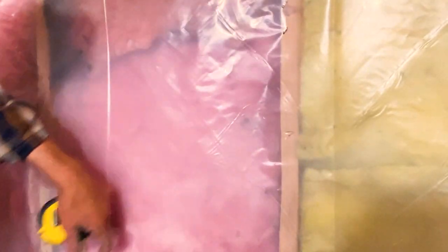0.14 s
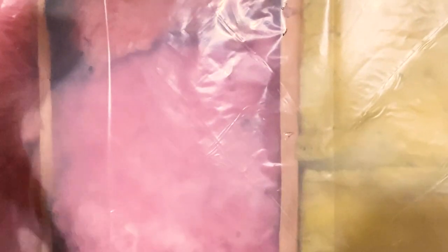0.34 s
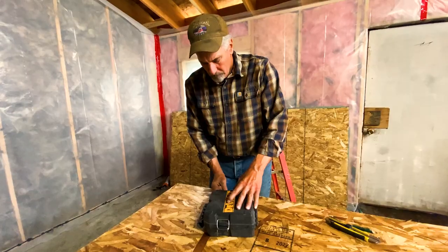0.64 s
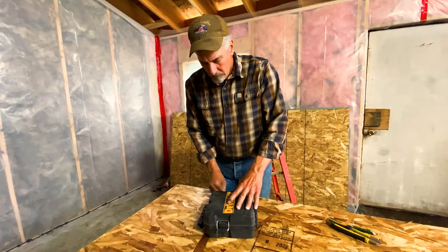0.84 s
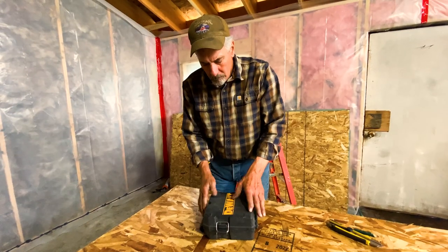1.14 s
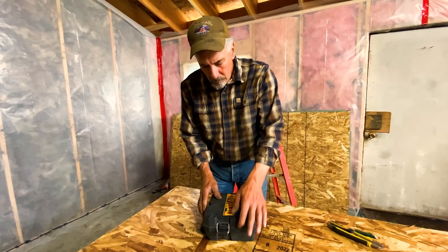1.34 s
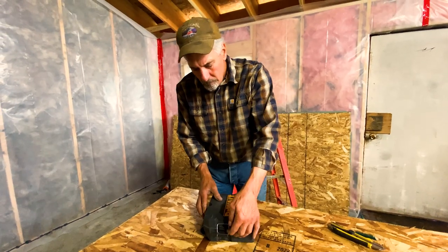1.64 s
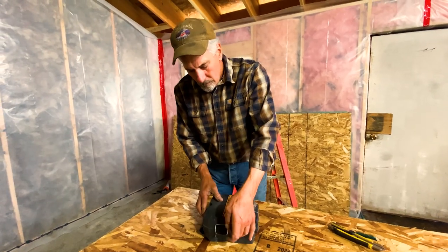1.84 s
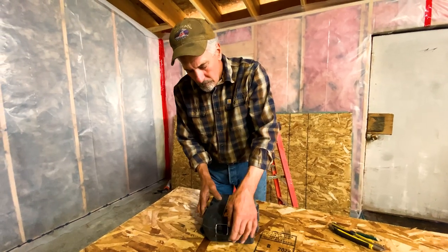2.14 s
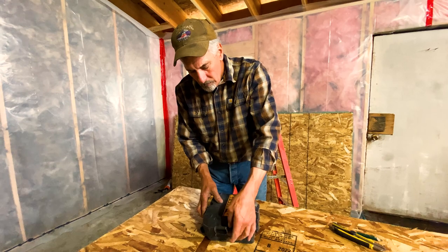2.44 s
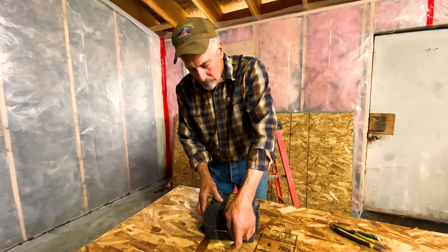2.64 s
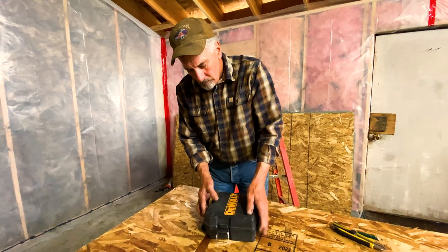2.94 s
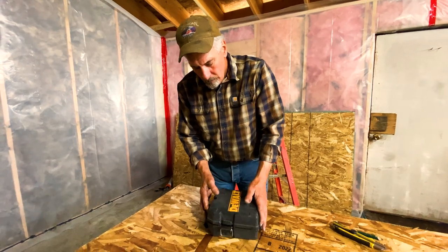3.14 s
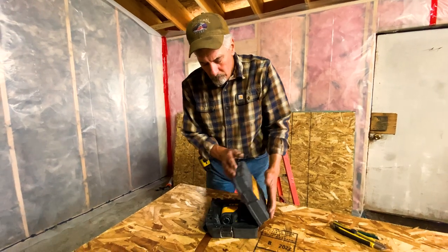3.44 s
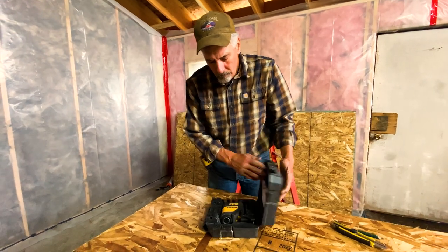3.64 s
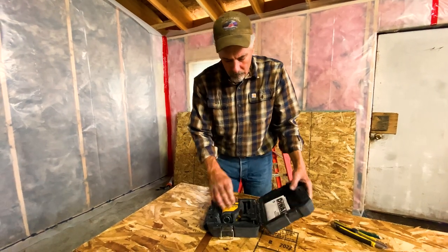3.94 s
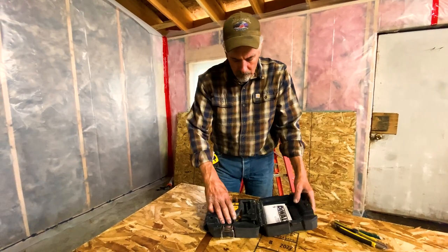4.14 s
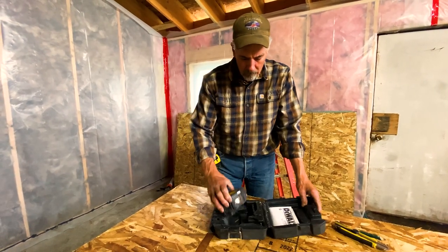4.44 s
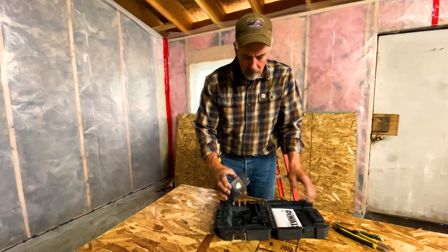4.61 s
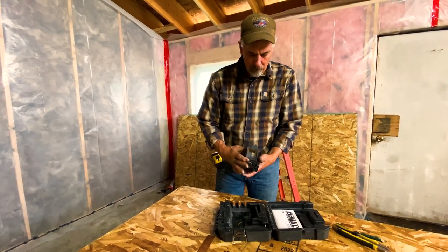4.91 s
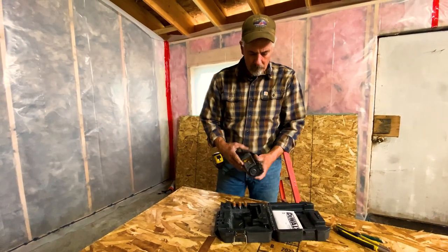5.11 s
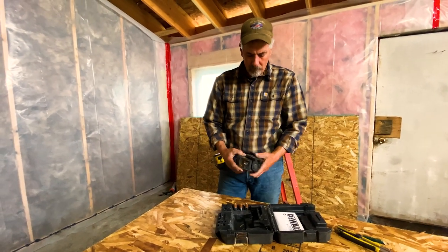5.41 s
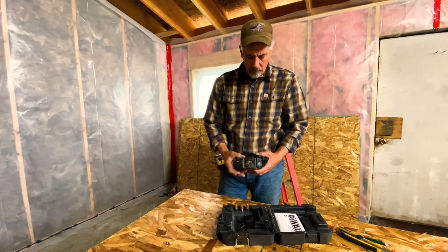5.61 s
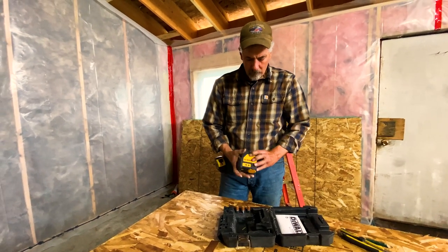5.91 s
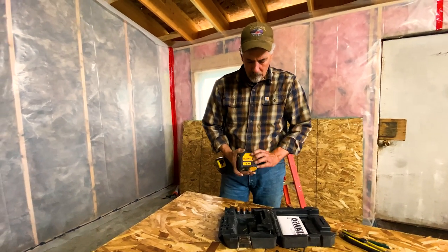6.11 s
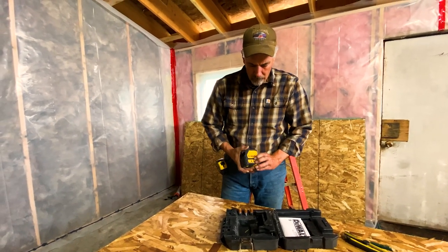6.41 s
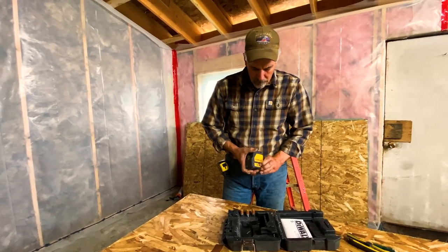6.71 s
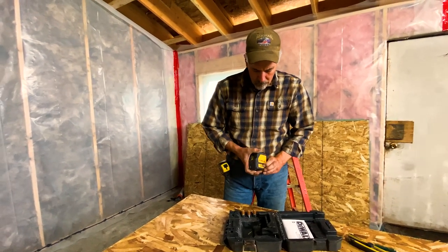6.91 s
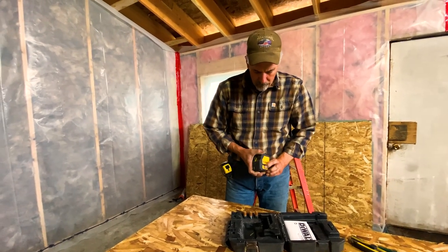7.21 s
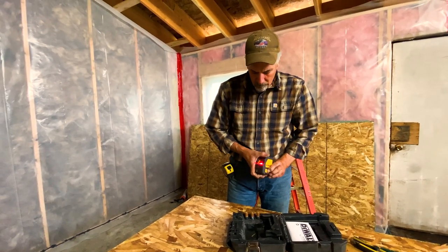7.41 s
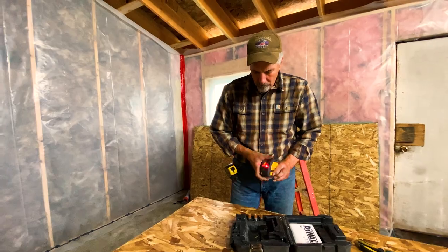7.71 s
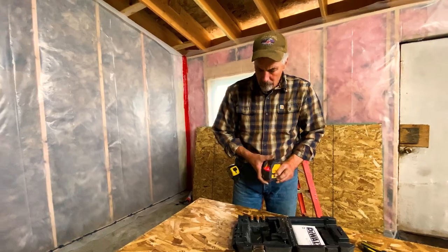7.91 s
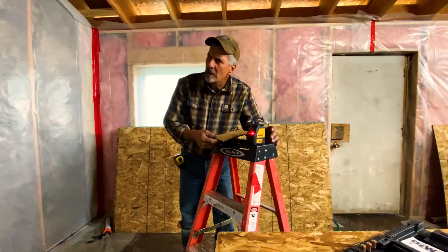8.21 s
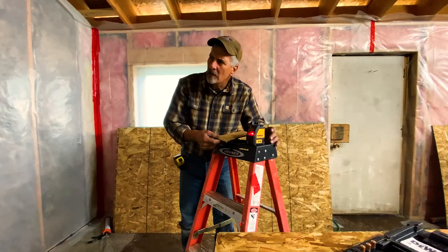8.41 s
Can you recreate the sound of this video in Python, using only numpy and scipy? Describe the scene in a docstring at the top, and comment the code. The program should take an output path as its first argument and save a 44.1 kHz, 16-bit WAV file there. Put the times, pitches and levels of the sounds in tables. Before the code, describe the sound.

From 0 to 0.3 seconds a steel tape rasps brightly into its housing, ending at 0.32 in a hard double snap with a soft noisy tail. At 0.65 to 0.9 a plastic case clatters onto a wooden bench, loudest near 0.86, with jingling latches. From 1.1 to 2.7 come small hollow knocks, dull board thumps and hand rustle, with a sharp latch crack at 1.9. The loudest, a bright latch snap, comes at 2.81. The case shifts and opens with knocks at 3.1 to 3.5, lighter bumps to 4.3, then a heavy clattering cluster at 4.45 to 4.7. Then it is nearly silent: clear small-tool clicks at 5.28 and 5.95, a fainter one at 7.34, barely audible handling. Faint low generator chugging runs outside throughout, fading, then swelling after 8.27 until the end at about 8.6. Short shed reverberation, close stereo microphone.

```python
"""In a bare timber shed a tape measure reels in and snaps home; then hands unlatch a plastic tool case on a board bench,
open it and lift out a small tool, whose switches click. A generator chugs outside, over still air.
Knocks, thumps, latches and switches are bodies struck by short noisy forces; tape, soft swells and air are shaped
noise; the generator is a train of filtered pulses. A stereo microphone with two ports listens."""
import sys
import numpy as np
from scipy import signal
from scipy.fft import rfft, irfft, next_fast_len
from scipy.io import wavfile
from scipy.ndimage import uniform_filter1d

SR = 44100
rng = np.random.default_rng(int(sys.argv[2]) if len(sys.argv) > 2 else 0)


def unload_wav(signal):
    """Save mono or channel-first audio to the path in sys.argv[1] as 16-bit WAV at rate SR, clipped to [-1, 1]."""
    wavfile.write(
        sys.argv[1],
        SR,
        np.round(np.clip(np.atleast_2d(signal).T, -1, 1) * 32767).astype(np.int16),
    )


N = 377055  # length in samples

# Still air in the shed. Each row: frequency in Hz, density in dB per Hz, relative.
AIR_COLOUR = [(40, -4), (130, -3), (250, -11), (330, -14), (500, -19), (1380, -21.5), (1660, -34),
              (6400, -30), (7200, -40), (10600, -42.5), (12000, -61), (15500, -68.5)]
AIR_DB = -65.5
# Exhaust through the walls at the first listening place. Each row: frequency in Hz, relative level in dB.
EXHAUST_FIRST = [(23, -31.5), (47, -2), (70, 0), (93, 0), (117, -1), (140, 4), (163, -1.5), (187, -13.5),
                 (210, 1.5), (233, 2.5), (257, -14.5), (300, -29), (450, -24), (900, -46.5), (3000, -94.5)]
# The same exhaust at the second place. Each row: frequency in Hz, relative level in dB.
EXHAUST_SECOND = [(23, -25.5), (47, -21), (70, -17), (93, 6), (117, -8.5), (140, -13), (163, 13),
                  (187, -7.5), (210, 4.5), (233, -14.5), (257, -4.5), (300, -36.5), (500, -28.5),
                  (900, -52), (3000, -95)]
# Course of the generator. Each row: time in seconds, level in dB, share of the second place (0 to 1),
# left over right in dB.
CHUG_COURSE = [(0, -56, 0.29, -2), (4.997, -59, 0.22, -7), (6.3, -63, 0.038, -7.5), (7.6, -64, 0, -8.5),
               (8.2, -65, 0.075, -10.5), (8.27, -62.5, 0.66, -3.5), (8.55, -50, 0.89, -2.5)]
FIRING_HZ = 23.35

# Dying of the reverberation. Each row: frequency in Hz, t60 in seconds.
SHED_T60 = [(100, 0.44), (400, 0.4), (1000, 0.38), (2800, 0.54), (7000, 0.56), (14000, 0.29)]
# Balance of the reverberation. Each row: frequency in Hz, relative level in dB.
SHED_BALANCE = [(60, -4.5), (250, -16), (1000, -8.5), (4000, -6.5), (14000, -12)]
# Likeness of left and right in diffuse sound. Each row: frequency in Hz, likeness (0 to 1).
LIKENESS = [(60, 0.7), (180, 0.18), (550, 0.53), (1650, 0.079), (4970, 0.051), (15000, 0.32)]
# Phase gap between the microphone ports. Each row: frequency in Hz, lead of the left in radians.
PORT_PHASE = [(0, -0.5), (2410, 0.5), (3360, 1.5), (4480, 1.5), (6120, 8.5), (6550, -3), (9220, 15),
              (9910, 11), (11800, 30), (12700, 7), (13500, 5.5), (14500, 4.5), (15200, 3.5), (15700, 0)]
EDGE_HZ = 16100  # upper band limit

# Swells of soft noise: hands and cloth moving, and noisy tails after the loud knocks.
# Each row: peak in seconds, level in dB, brightness in dB, rise in seconds, fall in seconds.
SWELLS = [(.38, -48.5, 5.5, 0.24, 0.69), (.74, -44, -9, 0.13, 0.092), (0.872, -25, 1.5, 0.029, .08),
          (.95, -37, 2.5, 0.098, 0.2), (1.231, -63, -8.5, 0.22, 0.55), (1.5, -47, -1.5, 0.12, 0.12),
          (1.68, -55.5, -2, 0.15, 0.52), (1.9, -43, -4, 0.18, 0.22), (2.36, -61, -6, 0.78, 1),
          (2.74, -52.5, -10.5, 0.052, .1), (2.92, -44.5, -1.5, 0.24, 1), (3.18, -40.5, -3.5, 0.072, 0.43),
          (3.38, -39, -2.5, 0.07, 0.15), (3.5, -47.5, 3.5, 0.32, .2), (3.69, -54, 2, 0.19, 0.99),
          (4.08, -57, 4, 0.35, 0.44), (4.35, -46.5, -3.5, 0.36, 0.8), (4.6, -64.5, 7, 0.38, 0.9),
          (4.99, -71.5, 10.5, 0.11, 0.13), (5.12, -69.5, 0.5, 0.11, 0.25), (5.42, -69, 2.5, 0.54, .2),
          (5.632, -67, 8, 0.083, 0.14), (5.764, -66, 6, 0.076, 0.32), (6.24, -65, -1, 0.44, 0.36),
          (6.52, -73.5, -3, .15, 0.31), (6.75, -69, -5, 0.67, 0.27), (7.18, -73.5, 0, 0.059, .15),
          (7.3, -74, -6, .1, 0.21), (7.6, -75.5, -0.5, .12, 0.12), (7.71, -76, 6, .06, 0.11),
          (7.84, -72, 2, 0.24, 0.16), (8.04, -72.5, 6.5, 0.11, 0.26), (8.22, -73.5, 0, 0.22, 0.066)]
# High range of the swells. Each row: frequency in Hz, density in dB per Hz, relative.
HISS_COLOUR = [(1760, -37.5), (3000, -8.5), (4300, -3.5), (5590, -3), (6940, -9), (10300, -10),
               (12100, -13), (12900, -12), (14300, -19.5), (15600, -33.5), (16000, -73.5)]
# Middle range of the swells. Each row: frequency in Hz, density in dB per Hz, relative.
SCRAPE_COLOUR = [(600, -27), (900, -3.5), (1500, 1), (2500, -2), (3800, -11.5), (5000, -34)]
# Low range of the swells. Each row: frequency in Hz, density in dB per Hz, relative.
RUMBLE_COLOUR = [(120, -29), (260, -4), (400, -9.5), (700, -3.5), (1000, -5.5), (1400, -40.5)]
HISS_DB, RUMBLE_DB = -2.5, -3  # relative to the scrape, before brightness
FADE_DB = 23  # drop over one rise or fall time
RESTING_DB = -92  # the soft noise never quite stops

# Switches of the small tool. Each row: start in seconds, click in dB, note in Hz, note over click in dB,
# contact in ms.
SWITCHES = [(5.281, -30, 2160, 6, 3.06), (5.949, -27.5, 1300, -2.5, 2.6), (7.339, -45, 1600, -11, 2)]
# Colour of a click in the tool's housing. Each row: frequency in Hz, density in dB per Hz, relative.
HOUSING_COLOUR = [(180, -47), (300, -4.5), (559, -10.5), (814, -6), (959, -21), (1210, 0), (2140, -6.5),
                  (3330, -15), (6840, -19.5), (15000, -53)]
TOOL_NOTE_S = .013  # t60

# Steel tape running in. Each row: time in seconds, level in dB.
TAPE_COURSE = [(0.0, -42.5), (0.036, -38.5), (0.19, -32), (0.21, -36.5), (0.312, -40), (0.315, -36)]
# Colour of the tape's rasp. Each row: frequency in Hz, density in dB per Hz, relative.
TAPE_RASP = [(240, -54), (400, -23), (1110, -15.5), (1310, -18.5), (2150, -7.5), (5590, -4), (10400, -7.5),
             (12100, -18.5), (13500, -14), (15200, -25), (16000, -53)]

# Dull thumps through the bench. Each row: start in seconds, peak level in dB, pitch in Hz, deep board over pitch in dB.
THUMPS = [(0.318, -32, 253, -31), (0.415, -53, 175, 10), (0.721, -35.5, 267, -19), (.789, -35, 210, -11),
          (0.867, -38, 272, -11), (1.112, -29, 249, -8), (1.183, -27, 261, -15.5), (1.24, -39.5, 302, -2),
          (1.271, -37, 227, -21), (1.509, -35, 228, -24), (1.678, -40.5, 226, -6), (1.859, -34.5, 185, -12),
          (1.949, -37, 237, -6), (2.209, -40, 227, -6.5), (2.253, -36.5, 281, -15),
          (2.555, -40.5, 270, -17), (2.806, -44, 238, -20), (3.197, -33.5, 182, -2),
          (3.228, -25, 240, -2.5), (3.361, -25, 237, -3.5), (3.407, -39, 124, 7), (3.69, -33, 337, -4.5),
          (4.067, -40.5, 208, -0.5), (4.188, -44.5, 249, -0.5), (4.259, -40, 224, -5),
          (4.321, -36, 217, -9), (4.464, -29.5, 195, -4.5), (4.536, -11.5, 340, -18.5),
          (4.579, -19.5, 218, -5.5), (4.658, -40, 310, 4)]
# Deep modes of the board. Each row: frequency in Hz, relative level in dB, t60 in seconds.
BOARD_MODES = [(70, -6, 0.17), (91.7, 1, 0.2)]
PUSH_MS = 9

# Loose steel latches set ringing. Each row: start in seconds, level in dB, tilt toward the highs in dB per octave.
RATTLES = [(0.684, -50, -2), (0.706, -42.5, -3), (.851, -24.5, -4), (1.462, -59, -3.5), (1.89, -45, -9),
           (2.296, -49.5, -1.5), (2.731, -49, -2), (2.809, -34, 3.5), (3.103, -43.5, -1), (3.2, -37.5, 2),
           (3.366, -34, -1), (3.468, -37, 0), (4.261, -59.5, 5.5), (4.332, -56, -6), (4.456, -46, -4),
           (4.538, -39, -9.5), (4.565, -37, 4.5), (4.67, -42.5, 2)]
# Thin tones of the latches. Each row: frequency in Hz, level in dB, t60 in seconds.
STEEL_MODES = [(4510, -1.5, 0.21), (5557, -1, 0.56), (7210, -0.5, 0.25), (6700, -6.5, .35),
               (8310, -5, 0.18), (8560, 2, .2), (9270, -2.5, .25), (9300, -4, 0.16), (11040, 6, .22),
               (11520, -8, 0.33), (12340, -8, .2), (13330, -0.5, 0.45), (13650, -3.5, .15),
               (14900, -9, .12)]
RATTLE_MS = 7.7

# Knocks and clicks on plastic and steel. Each row: start in seconds, snap in dB, note in Hz, shell in dB and tick in dB
# (both relative to the snap), contact in ms, left over right in dB.
KNOCKS = [(0.027, -35, 3670, -21, 5, 1.4, 9), (.051, -41, 2390, -21, 10, 1, 2),
          (.323, -11.5, 3880, -44, 4, 5.9, 1), (.328, -9, 2610, -27, -22, 3.2, 7),
          (.607, -41.5, 840, -1, -13.5, 2.2, 2), (0.637, -52, 654, 11, -52, 4.2, -2),
          (0.657, -29, 654, 4, -40, 0.7, 10.5), (0.682, -46, 2350, 0, -8, 3.1, -9),
          (0.71, -20.5, 1600, -18, -7.5, 7.6, 0), (.73, -31.5, 930, -1.5, -1, 3.6, 7),
          (.794, -35, 816, -10, -7, 3.4, .5), (0.816, -38.5, 837, -0.5, 3.5, 22, 1),
          (0.851, -12, 2800, -28, -35, 5.1, -5), (.869, -10.5, 774, -18, -17, 7.5, -1),
          (.883, -15, 915, -19, -9, 2.8, 3), (1.087, -34, 690, -18, -33, 5, 3),
          (1.108, -36, 1040, -2, -29, 5.7, 4.5), (1.161, -30, 594, 2.5, -13, 3.4, -.5),
          (1.187, -48, 643, 6, -22, 2.2, 9), (1.236, -52.5, 807, 15.5, -23, 3.3, .5),
          (1.269, -38.5, 586, 10, -15, 7.3, 0), (1.284, -36.5, 891, -6, -16, 2.4, 0),
          (1.333, -49.5, 611, 8.5, -26, 2.7, 4), (1.409, -37.5, 760, -2.5, -13.5, 5.1, -.5),
          (1.467, -26.5, 765, -17, -3, 4.1, 0), (1.5, -26, 860, -2.5, -34, 8.7, -1),
          (1.511, -28.5, 880, -1.5, -15, 6.3, 0), (1.606, -28, 805, -20, -13, 7.2, -1.5),
          (1.633, -44, 770, -12, 2.5, 4.8, 1.5), (1.684, -32, 800, -15, -5, 8.2, -1),
          (1.71, -26.5, 940, -5, -1, 7.6, -.5), (1.864, -33, 645, -22, -19, 5.8, -1),
          (1.894, -11, 727, -44, -11.5, 4.7, -1.5), (1.959, -21.5, 830, -15, -14, 6.9, -.5),
          (1.988, -33, 2640, -5, -3, 3.7, 0), (2.199, -39, 795, -4.5, -12.5, 10, -0.5),
          (2.256, -62, 694, 13, -2, 4.9, 2), (2.298, -22, 810, -6.5, -3.5, 4.8, 0),
          (2.395, -30.5, 634, -21.5, -36, 7, 0), (2.448, -48, 1495, -3.5, -11.5, 3, -1.5),
          (2.56, -58.5, 780, 17, -32.5, 4.3, 0), (2.716, -31, 804, -16, -28, 10, -1),
          (2.735, -25.5, 800, -16.5, -7, 7.5, -0.5), (2.746, -28.5, 807, -19, -11, 20, 0),
          (2.81, -2, 1302, -24, -9.5, 3.8, .5), (2.813, -10, 2550, -30, -20, 4, 0),
          (3.102, -16.5, 1400, -30, -16.5, 4.9, -.5), (3.175, -17, 666, -17, -21, 9.8, -1),
          (3.204, -16.5, 1950, -6.5, -0.5, 5.3, -.5), (3.227, -18, 1020, -25, -10, 4.9, 3),
          (3.365, -11, 684, -12, -29, 6.3, -1), (3.377, -24, 640, 1.5, -3.5, 6.9, 1.5),
          (3.467, -28, 2260, -27, -9, 13, -3), (3.493, -26.5, 1070, -27, -16, 6.7, 0),
          (3.606, -33, 1320, -33, -7, 14, 0), (3.697, -32.5, 750, -0.5, -10, 15, -2.5),
          (3.973, -59, 1890, -22, 9, 1.5, -3), (4.038, -33.5, 910, -16, -9.5, 10, -2),
          (4.062, -33.5, 1740, -4.5, -11, 7, 1.5), (4.184, -35, 1610, -6.5, -17, 3.5, -1),
          (4.249, -36, 1190, -15, -9, 9.8, 0), (4.258, -36, 660, -10, -9, 11, -2),
          (4.321, -36, 840, -10, -25, 5.7, -1), (4.327, -28.5, 696, -14, -11.5, 11.5, -2),
          (4.456, -23.5, 890, 1.5, -19, 4, -1), (4.468, -28, 990, -12, -12, 13, 1),
          (4.541, -12, 800, -9, -21.5, 3.9, -11), (4.553, -16, 745, 2.5, -14, 6.1, 4),
          (4.566, -14.5, 1820, 2, -12, 6, -4), (4.575, -20, 930, -20, -9, 11, 9),
          (4.585, -22, 724, -8, -5.5, 4.2, -10), (4.599, -28, 720, -10, -3, 3.6, -3.5),
          (4.661, -27, 1510, -21, -27, 3.1, 8), (4.67, -27, 1430, -20, -4.5, 11, 0),
          (4.684, -24.5, 820, -8, -11.5, 7.4, 0)]
# Shell of the case. Each row: frequency in Hz, relative level in dB, t60 in seconds.
SHELL_MODES = [(302.3, 0.5, 0.099), (378, -2, 0.068), (430, 0, 0.057), (595, -2.5, 0.011), (640, -2.5, .03),
               (757, -8.5, 0.051), (825, -3, 0.023), (1080, -0.5, 0.022)]
# Lid of the case. Each row: frequency in Hz, relative level in dB, t60 in seconds.
LID_MODES = [(1350, 0.5, 0.0099), (1806, 3, 0.014), (2104, 10, 0.0098), (2500, 9.5, 0.0085),
             (3080, 3, 0.0048), (3480, -15, 0.011)]
# Colour of the tick. Each row: frequency in Hz, density in dB per Hz, relative.
TICK_COLOUR = [(2060, -29), (3500, -4), (4100, -7), (5400, -1.5), (6400, 0.5), (8300, -11), (10700, -2.5),
               (12100, -19), (13700, -13.5), (15000, -19), (16000, -36.5)]
NOTE_DB, LID_DB = -7.5, -10.5  # relative to the snap
NOTE_CYCLES, NOTE_EXTRA_MS = 8, 3  # a note's t60: this many cycles plus a fixed time


def gain_of(db):
    """Decibels to amplitude."""
    return 10 ** (np.asarray(db) / 20)


def evened(x):
    """Scales to rms 1."""
    return x / np.sqrt(np.mean(x ** 2) + 1e-20)


def unit(taps):
    """Scales a response to energy 1."""
    return taps / np.linalg.norm(taps, axis=-1, keepdims=True)


def read(points, hz):
    """Reads a table on a log-frequency axis."""
    f, value = np.transpose(points)
    return np.interp(np.log(hz + 1), np.log(f + 1), value)


def add(mix, s, sound):
    """Mixes a sound in at a time, cutting what runs past the end."""
    part = mix[..., round(s * SR):][..., :sound.shape[-1]]
    part += sound[..., :part.shape[-1]]


def causal(points, size=8192):
    """Minimum-phase response with the given spectrum: its energy comes as early as it can."""
    hz = abs(np.fft.fftfreq(size, 1 / SR))
    log_gain = np.log(gain_of(np.maximum(read(points, hz), -100)))
    spectrum = np.exp(np.conj(signal.hilbert(log_gain)))
    return unit(np.fft.ifft(spectrum).real[:size // 2])


def ringing(modes, size=22050):
    """Response of a struck body: a sum of dying sines."""
    t = np.arange(size) / SR
    return unit(sum(gain_of(db - 60 * t / t60) * np.sin(2 * np.pi * hz * t) for hz, db, t60 in modes))


def chatter(length_ms, shake, rise):
    """Noisy force of a contact that rises over a share of its length and dies away."""
    t_ms = np.arange(shake.shape[-1]) * 1000 / SR
    return shake * (1 - np.exp(-t_ms / (rise * length_ms))) * np.exp(-t_ms / length_ms)


def struck(force, body):
    """A body answers with the energy of the force, whatever the chance in the contact."""
    return np.linalg.norm(force) * unit(signal.fftconvolve(force, body))


def without_bass(x, hz):
    """A small body radiates little below its lowest mode."""
    return signal.sosfilt(signal.butter(3, hz, "high", fs=SR, output="sos"), x)


def low_notes_late(x, turns):
    """Every note is held back by nearly the same number of cycles, so a knock sweeps downward."""
    size = next_fast_len(N + SR)
    hz = np.fft.rfftfreq(size, 1 / SR)
    delay = np.exp(-2j * np.pi * turns * np.log(hz + 40))
    return irfft(rfft(x, size) * delay, size)[:, :N]


def wander(frames, per_s):
    """Slow chance at the frame rate of the noise."""
    return evened(uniform_filter1d(rng.standard_normal(frames), max(int(SR / 128 / per_s), 1)))


def shared(left, other, hz):
    """Right channel of a diffuse sound: part copy of the left, part its own chance."""
    same = read(LIKENESS, hz)[:, None]
    return same * left + np.sqrt(1 - same ** 2) * other


def noise(points, level_db, patchy_db, flicker_db):
    """Stereo random short-time spectra with patches and a flicker shared by all bands."""
    frames, hz = N // 128 + 5, np.fft.rfftfreq(512, 1 / SR)
    a, b, c, d, patches = rng.standard_normal((frames, 257, 5)).T
    # patches spread over 6 bands and 16 frames
    patches = evened(uniform_filter1d(uniform_filter1d(patches, 6, 0), 16, 1))
    left = a + 1j * b
    z = np.array([left, shared(left, c + 1j * d, hz)])
    z *= gain_of(read(points, hz)[:, None] + patchy_db * patches + flicker_db * wander(frames, per_s=60))
    sound = signal.istft(z, nperseg=512, noverlap=384)[1][:, :N]
    return gain_of(level_db) * evened(sound)


def air():
    """Still air is a faint, nearly steady noise."""
    return noise(AIR_COLOUR, AIR_DB, patchy_db=1.1, flicker_db=.6)


def shed(x):
    """Sparse taps of random sign, each band dying at its own speed; the ports share the bass most."""
    taps = np.zeros((2, SR // 2))
    at = np.arange(260, SR // 2 - 20, 20)
    at = at + rng.integers(0, 20, (2, len(at)))
    np.put_along_axis(taps, at, rng.choice([-1., 1.], at.shape), 1)
    hz, t, z = signal.stft(taps, SR, nperseg=256)
    z[1] = shared(z[0], z[1], hz)
    dying = gain_of(-60 * t / read(SHED_T60, hz)[:, None])
    z = z * dying * (1 - np.exp(-t / 0.005))  # far walls answer late
    z *= (gain_of(read(SHED_BALANCE, hz)) / np.linalg.norm(z[0], axis=1))[:, None]
    tail = signal.istft(z, SR, nperseg=256)[1]
    return signal.fftconvolve(x.mean(0)[None], gain_of(-6) * unit(tail), axes=1)[:, :N]


def at_ports(x):
    """Direct sound reaches the two microphone ports with a phase gap."""
    size = next_fast_len(N)
    half = np.exp(.5j * read(PORT_PHASE, np.fft.rfftfreq(size, 1 / SR)))
    return irfft(rfft(x, size) * np.array([half, 1 / half]), size)[:, :N]


def generator():
    """One exhaust pulse a firing, uneven in time and strength; it reaches the right port later."""
    s, *columns = np.transpose(CHUG_COURSE)
    db, moved, pan_db = (np.interp(np.arange(N) / SR, s, c) for c in columns)
    firings = np.arange(int(FIRING_HZ * N / SR) - 1)
    late, strength = rng.standard_normal((len(firings), 2)).T
    at_s = (firings + .4) / FIRING_HZ + .0002 * late
    pulses = np.zeros(N)
    pulses[np.clip(at_s * SR, 0, N - 1).astype(int)] = gain_of(1.2 * strength)
    first, second = (evened(signal.oaconvolve(pulses, causal(c, size=16384))[:N])
                     for c in (EXHAUST_FIRST, EXHAUST_SECOND))
    chug = (1 - moved) * first + moved * second
    later = np.roll(chug, round(0.00049 * SR))
    return gain_of([db + pan_db / 2, db - pan_db / 2]) * np.array([chug, later])


def soft_swells():
    """Soft noise swells and fades in three ranges; a bright swell hisses more and rumbles less."""
    t = np.arange(0, N / SR, .002)
    powers = np.full((3, len(t)), gain_of(RESTING_DB) ** 2)
    for s, db, bright_db, rise_s, fall_s in SWELLS:
        swell_db = db - FADE_DB * np.maximum((s - t) / rise_s, (t - s) / fall_s)
        range_db = np.c_[[HISS_DB + bright_db, 0, RUMBLE_DB - bright_db]]
        powers += gain_of(swell_db + range_db) ** 2
    hiss, scrape, rumble = (np.interp(np.arange(N) / SR, t, np.sqrt(p)) for p in powers)
    out = hiss * noise(HISS_COLOUR, 0, patchy_db=1.5, flicker_db=1.6)
    out += scrape * noise(SCRAPE_COLOUR, 0, patchy_db=2.1, flicker_db=1.4)
    return out + rumble * noise(RUMBLE_COLOUR, 0, patchy_db=2.2, flicker_db=2.2)


def switches():
    """A short click in the tool's housing, with one note."""
    out, colour = np.zeros(N), causal(HOUSING_COLOUR)
    shakes = rng.standard_normal((len(SWITCHES), 2, 2205))
    for (s, db, hz, note_db, contact_ms), shake in zip(SWITCHES, shakes):
        bodies = [colour, ringing([(hz, 0, TOOL_NOTE_S)], size=4096)]
        click, note = map(struck, chatter(contact_ms, shake, rise=.1), bodies)
        add(out, s, gain_of(db) * (click + gain_of(note_db) * note))
    return out


def tape():
    """The steel tape rasps over the lip of its housing until the hook snaps home."""
    s, db = np.transpose(TAPE_COURSE)
    level_db = np.interp(np.arange(N) / SR, s, db, right=-120)
    return noise(TAPE_RASP, level_db, patchy_db=1.8, flicker_db=1.5)


def thumps():
    """A soft push sounds a pitch set by where it lands and rocks the whole board."""
    out = np.zeros(N)
    shakes = rng.standard_normal((len(THUMPS), 8820))
    for (s, db, hz, deep_db), shake in zip(THUMPS, shakes):
        push = chatter(PUSH_MS, shake, rise=0.19)
        for part_db, modes in ((db, [(hz, 0, .04)]), (db + deep_db, BOARD_MODES)):
            thump = signal.fftconvolve(push, ringing(modes, size=8820))
            thump = without_bass(thump, 0.4 * modes[0][0])
            add(out, s, gain_of(part_db) * thump / abs(thump).max())
    return out


def latches():
    """Like steel parts ring slightly apart, so each thin high tone flutters; no two blows land alike."""
    out = np.zeros(N)
    apart, uneven_db = .0025, 3  # share by which the parts differ in pitch; spread of the tones
    chance = rng.standard_normal((len(RATTLES), len(STEEL_MODES), 4))
    shakes = rng.standard_normal((len(RATTLES), 4410))
    for (s, db, tilt_db), shake, draws in zip(RATTLES, shakes, chance):
        force = chatter(RATTLE_MS, shake, rise=0.086)
        for (hz, mode_db, t60), (strength, *off) in zip(STEEL_MODES, draws):
            parts = ringing([(hz * (1 + apart * d), 0, t60) for d in off], size=12000)
            tone_db = db + mode_db + uneven_db * strength + tilt_db * np.log2(hz / 8000)
            add(out, s, gain_of(tone_db) * struck(force, parts))
    return out


def knocks():
    """Each contact rings lid and shell, ticks, and sounds the note of the struck part."""
    out = np.zeros((2, N))
    bodies = [ringing(LID_MODES, size=4096), ringing(SHELL_MODES, size=4096), causal(TICK_COLOUR)]
    shakes = rng.standard_normal((len(KNOCKS), 4, 4410))
    shakes[..., 18] += 12  # the first blow stands out of the chatter
    for (s, db, hz, shell_db, tick_db, contact_ms, pan_db), shake in zip(KNOCKS, shakes):
        note = ringing([(hz, 0, NOTE_CYCLES / hz + NOTE_EXTRA_MS / 1000)], size=4096)
        parts = map(struck, chatter(contact_ms, shake, rise=0.14), bodies + [note])
        knock = gain_of([LID_DB, shell_db, tick_db, NOTE_DB]) @ np.array(list(parts))
        add(out, s, gain_of(db + np.array([[pan_db / 2], [-pan_db / 2]])) * knock)
    return out


def scene():
    """Struck sounds and their reverberation over tape, soft swells, generator and still air."""
    hits = low_notes_late(without_bass(knocks(), hz=262), turns=1.6)
    hits = hits + switches() + thumps() + latches()
    return air() + generator() + soft_swells() + tape() + shed(hits) + at_ports(hits)


def record(dry):
    """The deep bass is dropped and the treble dips near 12.2 kHz; full scale clips; then the band limit."""
    heard = signal.sosfilt(signal.butter(4, 38, "high", fs=SR, output="sos"), dry)
    heard = np.clip(signal.lfilter(*signal.iirnotch(12200, 7.0, SR), heard), -1, 1)
    band = signal.firwin(511, EDGE_HZ, window=("kaiser", 9), fs=SR)
    return signal.oaconvolve(heard, band[None], "same")


dry = scene()
out = record(dry)
unload_wav(out)
```